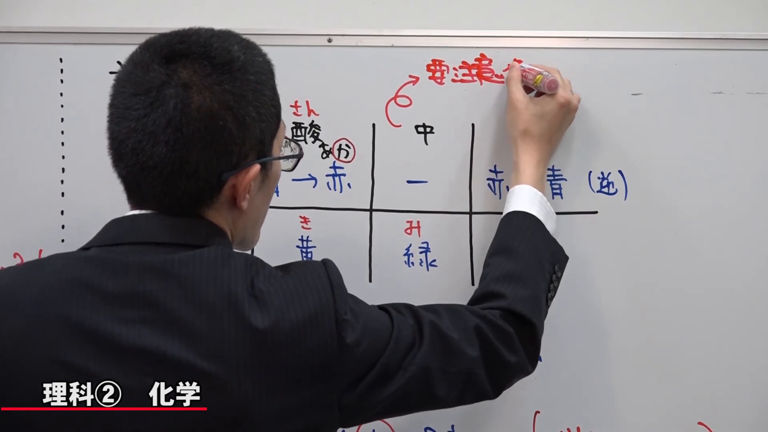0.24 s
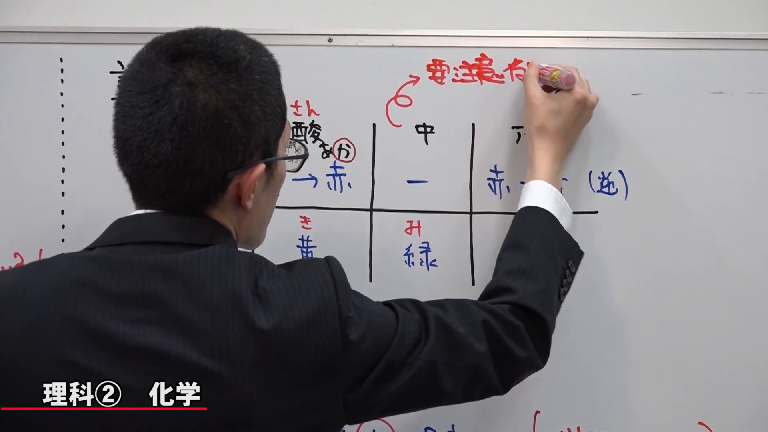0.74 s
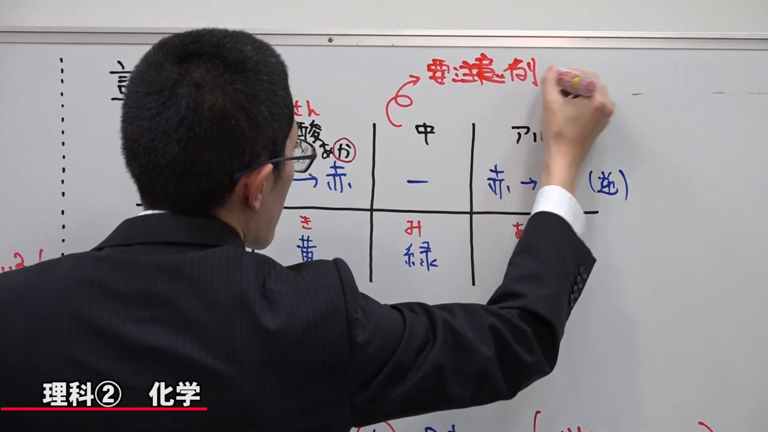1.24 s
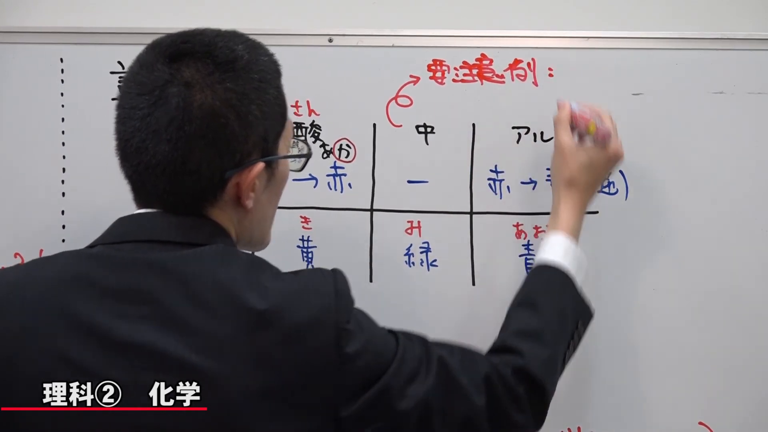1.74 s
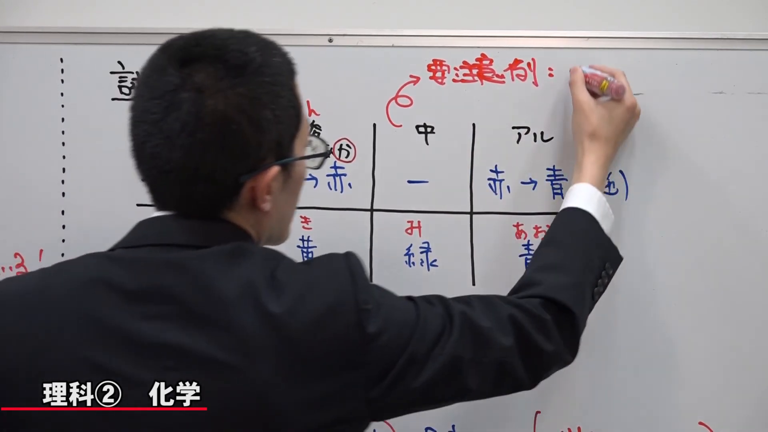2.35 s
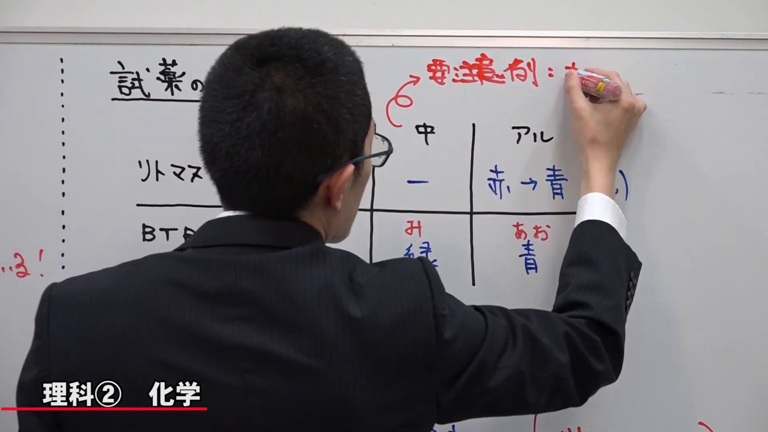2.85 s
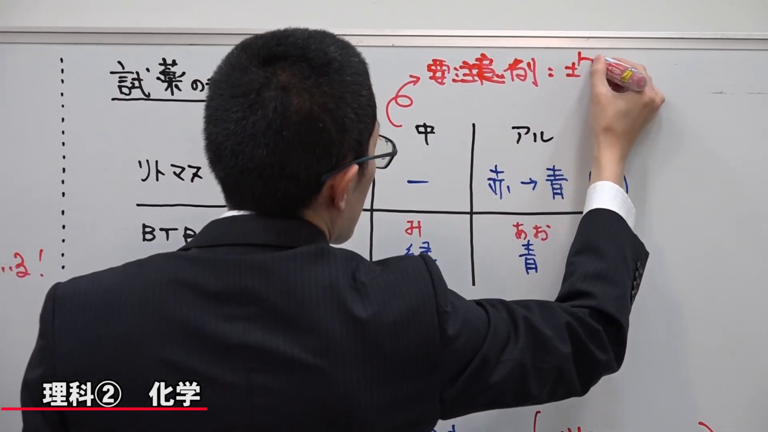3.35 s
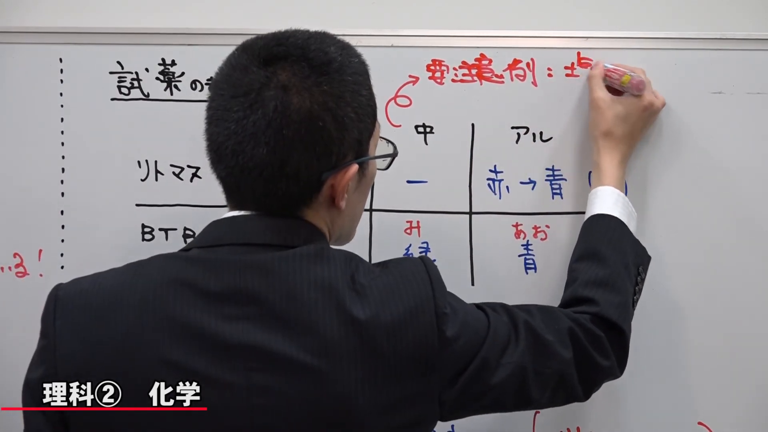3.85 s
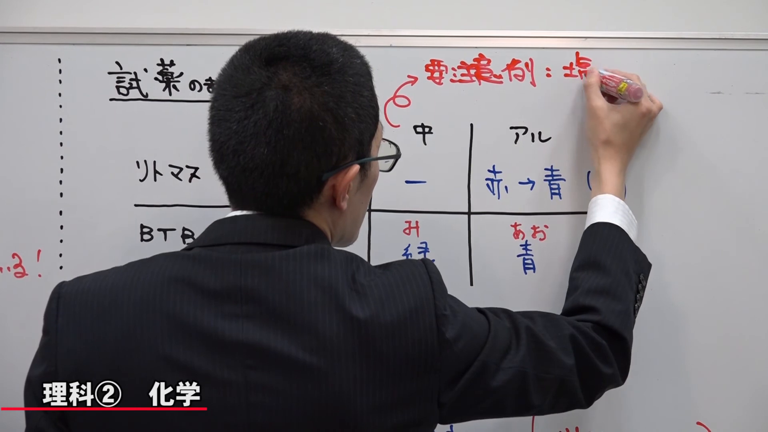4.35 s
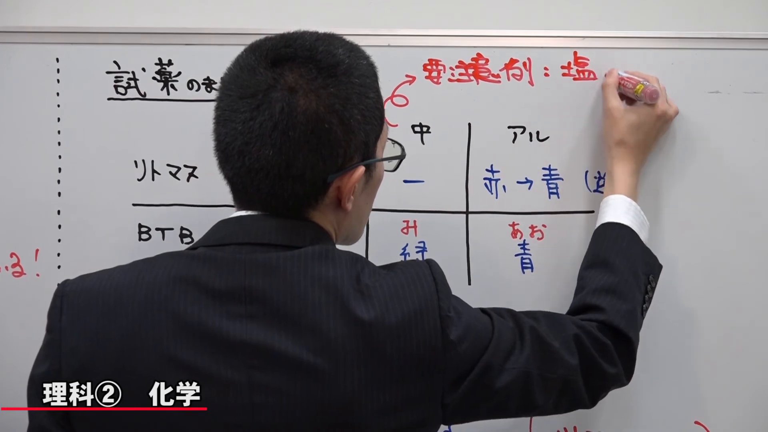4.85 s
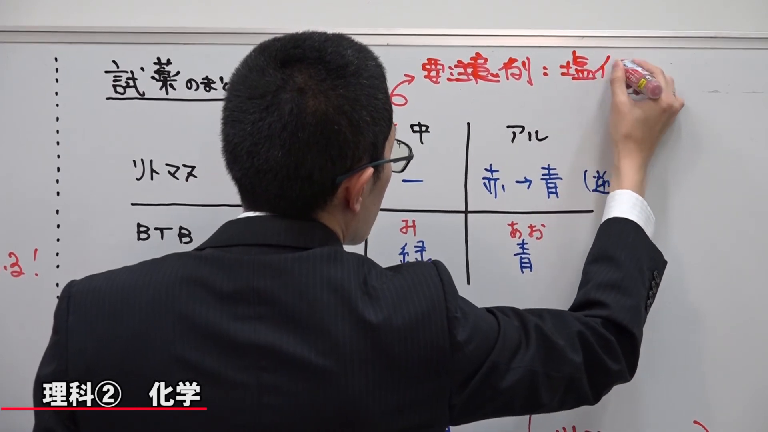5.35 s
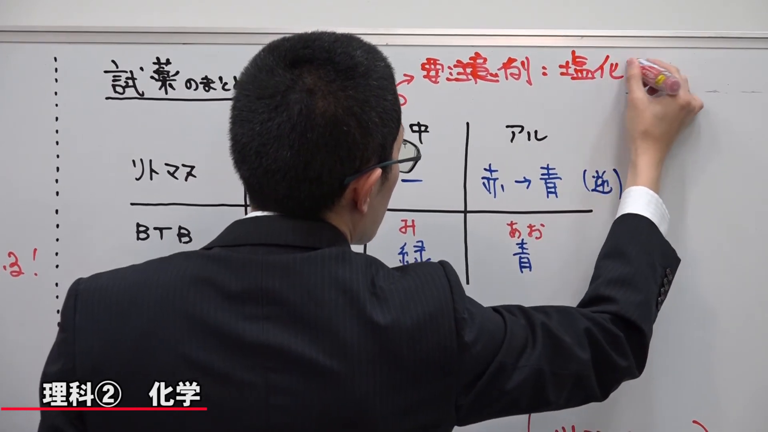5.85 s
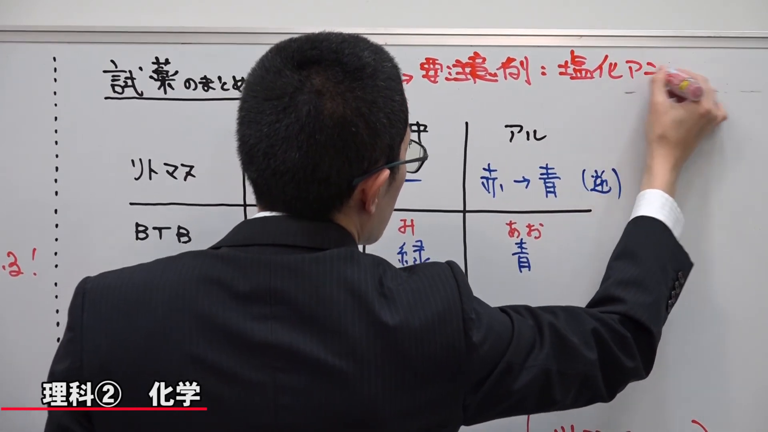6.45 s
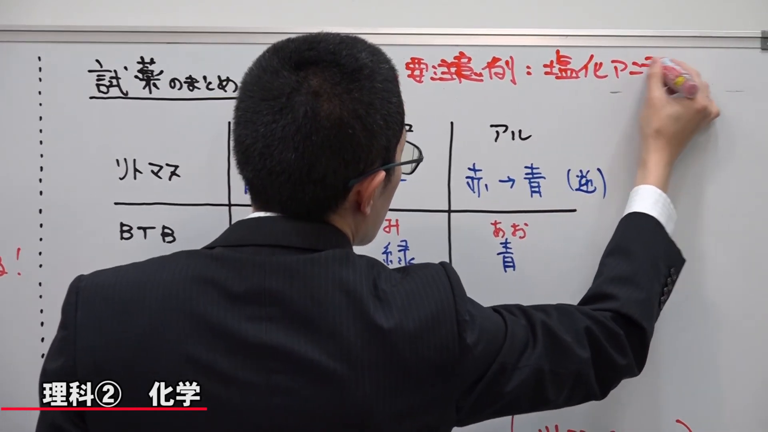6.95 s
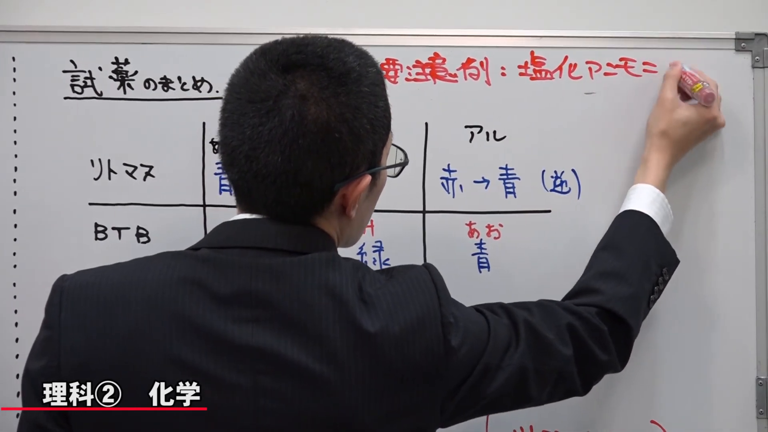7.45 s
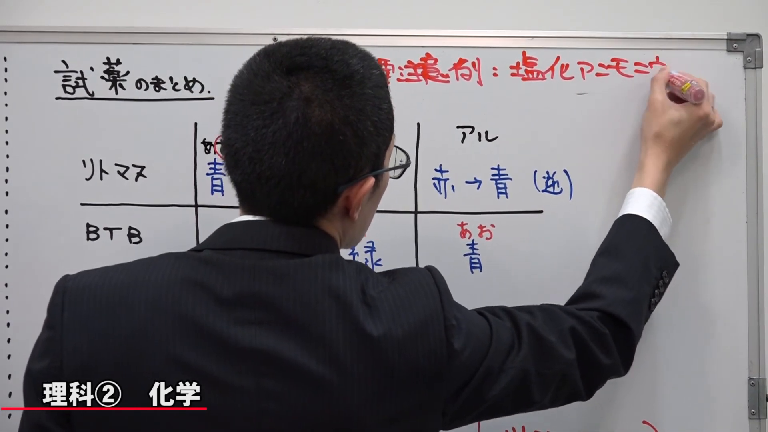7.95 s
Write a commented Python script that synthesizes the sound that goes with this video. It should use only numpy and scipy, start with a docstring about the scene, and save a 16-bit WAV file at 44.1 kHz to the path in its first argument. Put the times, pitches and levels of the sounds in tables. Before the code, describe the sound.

A felt marker knocks and strokes a large whiteboard, hollow low thuds with small dry ticks and faint rubbing in a quiet room.

```python
"""A felt marker taps and strokes a large wall whiteboard, close to a microphone in a quiet room.
From the outset there is room rumble and hiss (shaped noise), and the board still swings deeply (fading sines).
Each landing then knocks the panel: a thud that comes back twice, a spray of plate modes and bursts of noise.
After it the felt rubs (filtered noise) and catches in small dry ticks (slips shaking the board's skin).
A sleeve swishes near 2 s (swelling noise); from about 6 s the thuds come back sooner and more strongly."""
import sys
import numpy as np
from scipy import signal
from scipy.fft import rfft, irfft
from scipy.io import wavfile
from scipy.ndimage import uniform_filter1d

SR = 44100
rng = np.random.default_rng(int(sys.argv[2]) if len(sys.argv) > 2 else 0)


def waveform_to_disk(signal):
    """Save audio, clipped to [-1, 1], as 16-bit WAV at the path in sys.argv[1]."""
    frames = np.transpose(np.atleast_2d(signal))
    scaled = np.clip(frames, -1, 1) * 32767
    samples = np.round(scaled).astype(np.int16)
    wavfile.write(sys.argv[1], SR, samples)


N = 361179
T = np.arange(N) / SR


def undb(db):
    """Turn decibels into a plain gain."""
    return 10 ** (np.asarray(db) / 20)


def add(out, s, sound):
    """Mix a short sound in at time s."""
    i = int(s * SR)
    out[i:i + len(sound)] += sound[:N - i]


def band_pass(lo_hz, hi_hz, x):
    """Keep the sound between two frequencies."""
    return signal.sosfilt(signal.butter(2, [lo_hz, hi_hz], "band", fs=SR, output="sos"), x)


def coloured(table, db):
    """Steady noise with the given spectrum and rms level."""
    hz, shape_db = np.transpose(table)
    f = np.maximum(np.arange(N // 2 + 1) * SR / N, 1)
    gain = undb(np.interp(np.log(f), np.log(hz), shape_db))
    noise = irfft(rfft(rng.standard_normal(N)) * gain, N)
    return noise * undb(db) / noise.std()


def ring(hz, db, t60, seconds):
    """Struck modes: a sum of fading sines, each slightly off tune and with its own sign."""
    t = np.arange(int(seconds * SR))[:, None] / SR
    hz = hz * (1 + 0.01193 * rng.standard_normal(len(hz)))
    sign = rng.choice([-1, 1], len(hz))
    modes = sign * undb(db - 60 * t / t60) * np.sin(2 * np.pi * hz * t)
    soft_start = np.minimum(t[:, 0] / 0.0034, 1)
    return modes.sum(axis=1) * soft_start


def burst(lo_hz, hi_hz, t60, seconds=.1):
    """Dense, blurred ringing: band noise of rms 1 made to die away by 60 dB in t60 seconds."""
    t = np.arange(int(seconds * SR)) / SR
    noise = band_pass(lo_hz, hi_hz, rng.standard_normal(len(t)))
    return noise / noise.std() * undb(-60 * t / t60)


def swells(rows):
    """Sum of bell-shaped swells in loudness."""
    return sum(undb(db) * np.exp(-.5 * ((T - s) / half) ** 2) for s, db, half in rows)


def after_landings(rise_s):
    """Each landing starts a swell that peaks at 1 after rise_s and then fades; overlaps add up."""
    hits = np.zeros(N)
    p = np.exp(-1 / (rise_s * SR))
    hits[(np.array(LANDINGS)[:, 0] * SR).astype(int)] = np.e / (rise_s * SR)
    return signal.lfilter([0, 1], [1, -2 * p, p * p], hits)


# noise of the room, same in both channels: [f/Hz, relative level/dB per Hz]
ROOM_SPECTRUM = [(12, -25), (20, -3.5), (85, -6.5), (116, -9.5), (149, -18.5), (220, -12.5), (363, -17.5),
                 (551, -20), (1170, -34.5), (1380, -33.5), (2100, -36.5), (14400, -40), (15600, -40)]
ROOM_DB = -57.5  # rms level


def room():
    """The quiet room: steady noise, strongest in the bass."""
    return coloured(ROOM_SPECTRUM, ROOM_DB)


# hiss unlike in the two channels: [f/Hz, relative level/dB per Hz]
HISS_SPECTRUM = [(180, -40), (300, -19.5), (923, -0.5), (1820, -10.5), (2450, -2.5), (5160, 0), (13700, 2),
                 (15600, -0.5)]
# low stir unlike in the two channels: [f/Hz, relative level/dB per Hz]
STIR_SPECTRUM = [(12, -17), (25, 10), (60, -14), (125, -29), (250, -26)]
HISS_DB, STIR_DB = -75.5, -84  # rms levels


def hiss_and_stir():
    """Microphone hiss and a faint low stir: the noise that sets the two channels apart."""
    return coloured(HISS_SPECTRUM, HISS_DB) + coloured(STIR_SPECTRUM, STIR_DB)


# the sleeve swishes as the arm drops and rises again: [middle t/s, level of the low band/dB, half length/s]
SLEEVE_SWISHES = [(1.945, -69, .11), (2.255, -72.5, 0.087)]
SLEEVE_TREBLE_DB = -4.5  # hiss band compared with the low band


def sleeve():
    """Cloth sliding on cloth: a soft swish in the low treble with a fainter hiss above."""
    low = band_pass(1100, 2360, rng.standard_normal(N))
    high = band_pass(3000, 8400, rng.standard_normal(N))
    swish = low / low.std() + undb(SLEEVE_TREBLE_DB) * high / high.std()
    return swish * swells(SLEEVE_SWISHES)


# louder slides of the felt over the enamel: [middle t/s, level/dB, half length/s]
FELT_SLIDES = [(0.48, -78.5, 0.13), (0.81, -70, 0.023), (1.14, -76, 0.086), (1.727, -66.5, 0.0041),
               (3.83, -73, .03), (4.33, -79, 0.061), (4.84, -75, 0.028), (5.18, -73.5, 0.026),
               (5.66, -74, 0.032), (6.2, -69.5, 0.0085), (7.09, -73, 0.024), (7.96, -79, 0.016)]
RUB_DB, RUB_RISE_S = -75, 0.012  # the tip skids off after every landing: level, time to its peak
SCRAPE_DB, SCRAPE_S = -82, 0.053  # duller scrape of the felt along the stroke: level, time to its peak


def rub():
    """Dense fibre slips of uneven size, heard as a faint grainy hiss and a duller scrape."""
    slips = rng.standard_normal(N) * undb(2 * rng.exponential(size=N))
    grain = band_pass(3000, 7500, slips)
    coarse = rng.standard_normal(N) * (rng.random(N) < 250 / SR)  # about 250 slips a second
    scrape = band_pass(800, 2000, coarse)
    hiss_gain = np.hypot(undb(RUB_DB) * after_landings(RUB_RISE_S), swells(FELT_SLIDES))
    scrape_gain = undb(SCRAPE_DB) * after_landings(SCRAPE_S)
    return grain / grain.std() * hiss_gain + scrape / scrape.std() * scrape_gain


# the tip catches and slips: [t/s, strength before each layer's offset/dB]
CATCHES = [(0.203, -63), (0.317, -56.5), (0.623, -46), (0.8298, -47), (1.0178, -59), (3.256, -50),
           (3.431, -60.5), (3.449, -70), (3.536, -67), (3.519, -63), (3.581, -45.5), (3.703, -64),
           (3.861, -53.5), (4.139, -58.5), (5.139, -48.5), (5.319, -62), (5.386, -55), (5.459, -51.5),
           (5.5816, -64), (5.747, -65), (5.847, -50.5), (6.19, -65), (6.283, -60), (6.415, -61),
           (6.589, -62.5), (6.665, -65), (7.014, -63), (7.1, -62), (7.172, -62), (7.362, -65), (7.445, -59),
           (7.632, -59), (7.771, -63), (7.846, -53.5), (7.971, -60.5), (7.996, -63)]
# thin skin of the board under a tick: [f/Hz, relative level/dB, time to fade by 60 dB/s]
SKIN_MODES = [(382, -5, .12), (581, -3, .14), (750, -4, .14), (1000, -3, .14), (1140, -2, .13),
              (1400, -6, .08), (1540, -3, .07), (1690, -1, .09), (2030, -13, .14)]
SKIN_SCATTER_DB = 2
FAINT_DB, FAINT_SCATTER_DB = -68, 1.5  # lowest strength of the faint catches, and their upward scatter
STROKE_S = .16  # span of time over which the faint catches are scattered
TICK_S, TICK_SHORTER_PER_DB = .013, 0.07  # run of slips from -46 dB up; share lost per dB below that


def faint_catches():
    """Two weak catches of the felt at random moments in the stroke after each landing."""
    catches = []
    for s, *_ in LANDINGS:
        for place, luck in rng.random((2, 2)):
            catches.append((s + STROKE_S * (0.22 + place), FAINT_DB - FAINT_SCATTER_DB * np.log(luck)))
    return catches


def ticks():
    """A brief run of slips shakes the skin modes and scrapes over the enamel."""
    out = np.zeros(N)
    hz, db, t60 = np.transpose(SKIN_MODES)
    t = np.arange(SR // 20) / SR
    dull = signal.butter(4, 1750, fs=SR, output="sos")
    for s, tick_db in CATCHES + faint_catches():
        length = TICK_S * np.clip(1 + TICK_SHORTER_PER_DB * (tick_db + 46), .2, 1)
        # cubing makes a few slips stand out
        slips = rng.standard_normal(len(t)) ** 3 * np.sqrt(t / length) * np.exp(-2 * t / length)
        modes_db = db + SKIN_SCATTER_DB * rng.standard_normal(len(hz))
        skin = signal.fftconvolve(slips, ring(hz, modes_db, t60, .15))
        grit = signal.sosfilt(dull, signal.fftconvolve(slips, burst(450, 1800, .11)))
        # both levels are set over the first 20 ms
        add(out, s, undb(tick_db - 11) * skin / skin[:SR // 50].std())
        add(out, s, undb(tick_db - 7) * grit / grit[:SR // 50].std())
    return out


# deep swings of the panel: [f/Hz, time to fade by 60 dB/s]
DEEP_SWINGS = [(61.8, 3.3), (94.1, 2.0), (134.5, 1.4)]
# strength of each deep swing at the outset: [level/dB]
OUTSET_DB = [-49, -49, -76]
# how strongly a blow pushes each swing where the pen stands; the sign turns across a still line:
# [t/s, gain on first swing, gain on second, gain on third]
PUSH_GAINS = [(0, 0.11, 0.3, .02), (1.7, 0.28, 0.5, 0.058), (2.599, 0.17, 0.3, 0.27), (3.4, 0.13, .13, 0.2),
              (4.7, 0.26, 0.23, 0.47), (5.4, 0.093, 0.061, 0.31), (6.2, 0.22, -0.072, 0.26),
              (6.5, 0.22, -0.23, 0.043), (7.1, 0.25, -0.1, -0.12), (7.3, 0.31, -0.26, -0.13),
              (7.9, 0.067, -0.42, -0.41)]
EARLIER_BLOW_S = .169  # how long before the outset the swings were last pushed; sets their phase
# a soft landing starts to push earlier and favours the deep swings (dB per dB)
SOFT_LEAD_S_PER_DB, SOFT_GAIN = .00012, 0.028


def swings():
    """Every blow pushes the deep swings, with or against their motion; they fade slowly."""
    s, edge_db, thud_db, _ = np.transpose(LANDINGS)
    at, *gains = np.transpose(PUSH_GAINS)
    soft_db = np.maximum(thud_db - edge_db, 0)
    place = ((s - SOFT_LEAD_S_PER_DB * soft_db) * SR).astype(int)
    half = SR // 500
    contact = np.hanning(SR // 250) / half  # spreads each push over 4 ms
    out = np.zeros(N)
    for (hz, t60), start_db, gain in zip(DEEP_SWINGS, OUTSET_DB, gains):
        push = np.zeros(N, complex)
        push[place] = np.interp(s, at, gain) * undb(thud_db + SOFT_GAIN * soft_db)
        push = signal.fftconvolve(push, contact)[half:][:N]
        push[0] = undb(start_db) * np.exp(2j * np.pi * hz * EARLIER_BLOW_S)
        # each sample turns the swing a little and shrinks it a little
        step = np.exp((2j * np.pi * hz - np.log(1000) / t60) / SR)
        out += signal.lfilter([1], [1, -step], push).real
    return out


def thud(thud_hz, hold):
    """The panel throbs for a few cycles, peaks once more after hold seconds, then drops away."""
    t = np.arange(SR // 10) / SR
    wobble = uniform_filter1d(rng.standard_normal((2, len(t))), size=160) * np.sqrt(160)
    phase = 2 * np.pi * np.cumsum(thud_hz * (1 + .05 * wobble[0])) / SR
    peak_db = 4 * np.exp(-((t - hold) / .003) ** 2)
    drop_db = -60 * np.maximum(t - hold, 0) / .03
    soft_start = np.minimum(t / 0.00224, 1)
    return soft_start * undb(peak_db + drop_db + 0.87 * wobble[1]) * np.sin(phase)


# landings of the tip, and one soft touch of the hand; strengths before each layer's offset:
# [t/s, hard edge level/dB, thud level/dB, crack level/dB]
LANDINGS = [(0.15, -42.5, -34, -78), (0.785, -35.5, -32, -65), (0.969, -74, -40.5, -80),
            (1.538, -49, -38, -83), (1.668, -36.5, -32.5, -60), (2.247, -63, -51, -74),
            (2.613, -42, -38, -92), (2.785, -46.5, -38.5, -85), (2.958, -42.5, -36, -75),
            (3.198, -46.5, -34.5, -86), (3.377, -51, -36, -80), (3.557, -41, -34.5, -76),
            (3.716, -59.5, -48.5, -77), (4.062, -44.5, -36.5, -78), (4.236, -66.5, -44, -74),
            (4.493, -43, -38, -69), (4.642, -50.5, -42.5, -91), (4.8, -45, -36.5, -61.5),
            (5.101, -53.5, -40.5, -80), (5.288, -71, -43.5, -69), (5.472, -43.5, -38, -80),
            (5.625, -44, -37.5, -77), (5.971, -57, -40.5, -79), (6.167, -45.5, -40.5, -79),
            (6.377, -43.5, -35, -57.5), (6.51, -35, -34, -56.5), (6.723, -36.5, -33.5, -64),
            (6.89, -36, -32, -57), (7.065, -48, -37, -83), (7.3, -39.5, -33, -58.5),
            (7.461, -36, -34, -55.5), (7.644, -39, -33, -77), (7.805, -36, -33, -62),
            (7.932, -75, -41, -66)]
# the frame sends the wave back; pitch and both paths change as the pen moves along the board:
# [t/s, thud f/Hz, length of first throb/s, delay of second throb/s, its level against the first/dB]
FRAME_RETURN = [(0, 286, 0.013, 0.026, -4), (1.7, 298.5, 0.016, 0.029, -19.5),
                (3.399, 286.3, 0.013, .03, -9.5), (4.6, 283, 0.013, .026, -13),
                (5.601, 284.3, 0.015, 0.0221, -4), (6.301, 296, 0.0047, .011, -1),
                (7.2, 294.3, 0.0042, 0.01202, -1.5), (8.2, 291, 0.0036, .012, -2.5)]
# plate modes under a blow: [f/Hz, relative level/dB, time to fade by 60 dB/s]
PLATE_MODES = [(151.7, -6, 0.75), (182.3, -5.5, 0.83), (213, -5, 0.7), (235, -4, 0.25), (265.8, -1.5, 0.2),
               (285.7, -4.5, 0.55), (299.7, 0.5, 0.39), (345, -8.5, 0.59), (402, -11, 0.47),
               (441.4, -9.5, 0.21), (467.4, -3.5, 0.15), (508, -17.5, 0.58), (537, -15.5, 0.41),
               (616, -12.5, 0.27), (637.4, -11.5, 0.16), (683, -22, 0.097), (775, -38, 0.077),
               (889, -30.5, 0.063), (983, -24, 0.11), (1110, -17.5, 0.058), (1180, -49, 0.25),
               (1400, -41, 0.26)]
PLATE_DB, PLATE_SCATTER_DB = -10, 3  # low modes against the thud; random spread of every mode
THUD_S = 0.0167  # length of a returned throb
AGAIN_S, AGAIN_DB = .025, -12  # the returned throb comes round once more, later and weaker


def landings():
    """Each blow makes the panel thud, its modes ring, a blurred wash spread and the tip crack."""
    out = np.zeros(N)
    hz, db, t60 = np.transpose(PLATE_MODES)
    at, *paths = np.transpose(FRAME_RETURN)
    # modes near the thud follow its strength, higher ones the hard edge of the blow
    high = np.clip(np.log2(hz / 330) / 0.4, 0, 1)
    for s, edge_db, thud_db, crack_db in LANDINGS:
        thud_hz, first, delay, return_db = (np.interp(s, at, path) for path in paths)
        back_s, back_db = s + delay, thud_db + return_db
        add(out, s, undb(thud_db) * thud(thud_hz, first))
        add(out, back_s, -undb(back_db) * thud(thud_hz, THUD_S))  # turned over at the frame
        add(out, back_s + AGAIN_S, undb(back_db + AGAIN_DB) * thud(thud_hz, THUD_S))

        blow_db = (1 - high) * (thud_db + PLATE_DB) + high * edge_db
        modes_db = blow_db + db + PLATE_SCATTER_DB * rng.standard_normal(len(hz))
        add(out, s, ring(hz, modes_db, t60, 0.34))

        # the wash, from low and slow to high and quick, and then the crack
        add(out, s, undb(thud_db - 12.5) * burst(134, 347, 0.56, seconds=0.77))
        add(out, s, undb(edge_db - 5.0) * burst(354, 683, 0.094))
        add(out, s, undb(edge_db - 15.5) * burst(490, 2080, 0.027))
        add(out, s, undb(crack_db) * burst(1300, 4500, 0.047))
    return out


def scene():
    """Board, sleeve and room reach both channels alike; hiss and stir enter them with opposite signs."""
    mid = room() + sleeve() + rub() + ticks() + swings() + landings()
    side = hiss_and_stir()
    return mid + side * np.array([[1], [-1]])


def record(dry):
    """The recorder cuts the top: a steep low-pass filter at 15740 Hz."""
    return signal.sosfilt(signal.ellip(10, .2, 70, 15740, fs=SR, output="sos"), dry)


dry = scene()
out = record(dry)
waveform_to_disk(out)
```